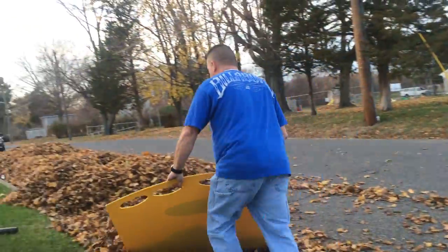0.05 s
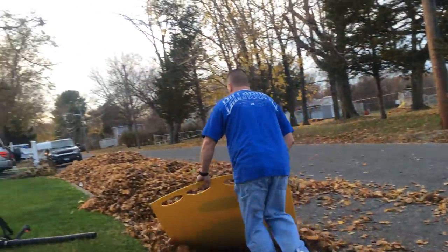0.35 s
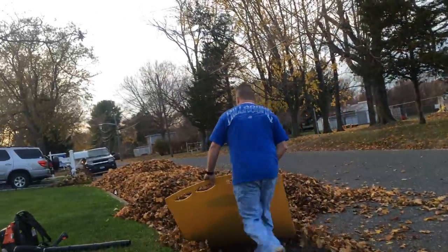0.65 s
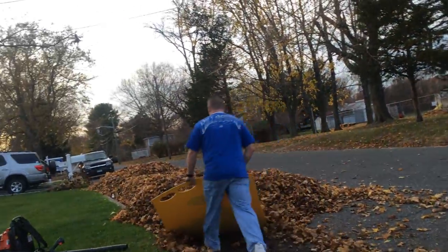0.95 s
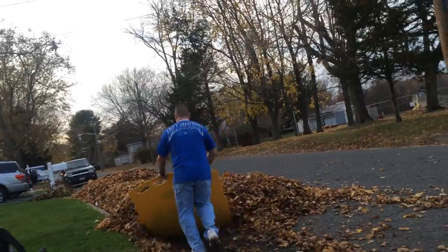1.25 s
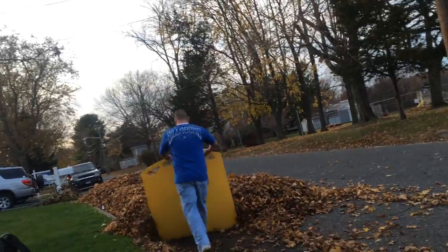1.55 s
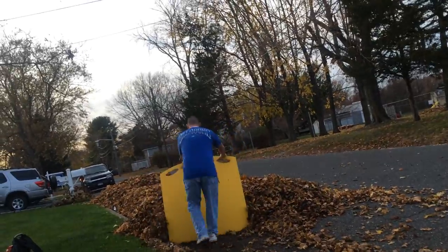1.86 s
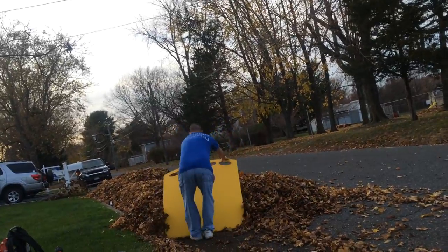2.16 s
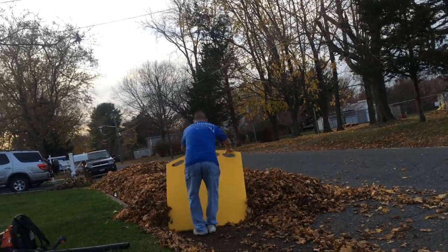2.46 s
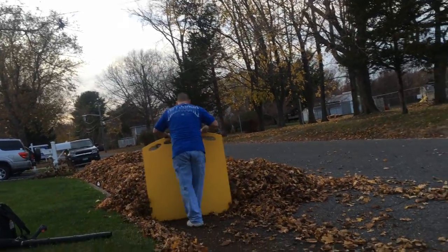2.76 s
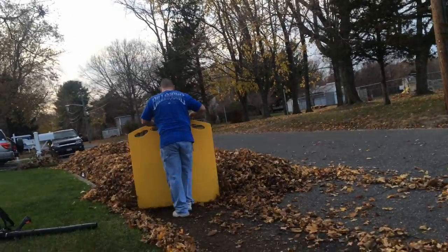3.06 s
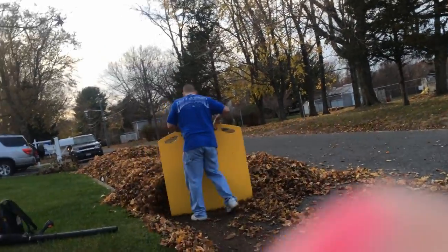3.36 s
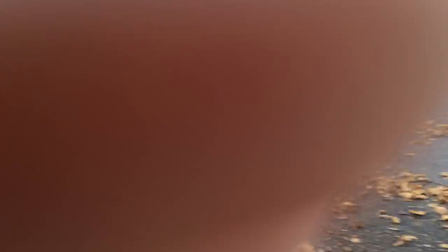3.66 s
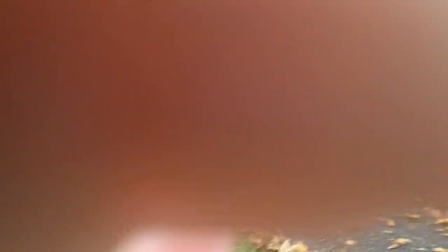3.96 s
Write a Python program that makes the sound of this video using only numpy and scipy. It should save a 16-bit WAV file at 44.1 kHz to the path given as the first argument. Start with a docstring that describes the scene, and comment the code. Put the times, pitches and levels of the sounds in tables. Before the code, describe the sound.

A large plastic blade scrapes across asphalt into dry leaves, crunching, drumming and groaning. It stops with a few scuffs and knocks, and the leaves settle. Faint traffic hums outdoors, and finally a hand bumps and rubs the microphone.

```python
"""An asphalt yard with distant traffic. A big plastic blade is shoved into a heap of dry leaves:
its edge chatters on the grit, leaves snap, and the plastic sheet drums and groans as it sticks and slips.
It stops and is tipped upright with short scuffs, taps and a few knocks, and the leaves settle.
Near the end a soft hiss swells and a hand bumps and rubs the microphone's case."""
import sys
import numpy as np
from scipy import signal
from scipy.fft import rfft, irfft
from scipy.io import wavfile
from scipy.ndimage import uniform_filter1d

SR = 44100
rng = np.random.default_rng(int(sys.argv[2]) if len(sys.argv) > 2 else 0)


def unload_audio(sound):
    """Save the sound as a 16-bit wav file, at the path given as the first command line argument."""
    columns = np.transpose(np.atleast_2d(sound))
    # keep every value between -1 and 1, then stretch to whole-number steps
    steps = np.round(np.clip(columns, -1, 1) * 32767)
    wavfile.write(sys.argv[1], SR, steps.astype(np.int16))


N = 176400
T = np.arange(N) / SR

# the shove (time [s], grit level [dB], drumming level [dB], rasp level [dB])
SHOVE = [(0,-23.5,-18,-37),(.07,-26.5,-25,-28),(.10,-30,-26,-34),(.21,-34.5,-20,-40.5),(.235,-32,-35,-35.5),(.27,-27,-20,-32.5),(.32,-29,-26,-29.5),(.345,-37.5,-33,-40.5),(.385,-30.5,-24.5,-31),(.45,-32.5,-27,-38),(.49,-31.5,-27.5,-33.5),(.58,-36.5,-29.5,-39.5),(.68,-28.5,-25.5,-37),(.76,-22,-22.5,-30.5),(.845,-24,-19.5,-34.5),(.876,-33.5,-25,-38.5),(1.0,-30.5,-26.5,-37),(1.07,-29.5,-21,-33.5),(1.18,-22.5,-21.5,-34),(1.245,-36,-24.5,-34.5),(1.282,-26,-23.5,-40.5),(1.328,-40.5,-27.5,-38),(1.35,-27.5,-26,-40),(1.37,-42,-38.5,-51),(1.422,-38.5,-37,-51),(1.52,-76,-88,-86)]
# modes of the plastic sheet (pitch [Hz], level [dB], t60 [s])
SHEET_MODES = [(142.6,-3,0.16),(189,1,0.047),(209,0.5,0.13),(230.6,-4.5,0.11),(261.5,-6.5,0.084),(330,-6.5,0.011),(394.3,-2.5,0.071),(440,-10,0.024),(536,-16.5,0.072),(677,-16.5,0.038),(792,-10.5,0.026),(963,-12.5,0.024)]
# midrange rasp of the dragged edge (frequency [Hz], level [dB])
RASP_EQ = [(150,-27.5),(600,8),(1000,6.5),(1350,1),(1800,-1),(2500,1),(3500,-1.5),(5000,-2),(9000,-17.5),(16000,-33)]
# dry tick of a hard contact (frequency [Hz], level [dB])
TICK_EQ = [(200,-21),(1000,2),(1700,0),(2600,1.5),(3700,-6.5),(5200,2.5),(8000,-1.5),(12000,-3.5),(15500,-15)]
KNOCK_RISE_S, MOTTLE_DB = 0.0017, 1.87


def amp(db):
    """Decibels to gain."""
    return 10 ** (np.asarray(db) / 20)


def unit(x):
    """Scales to rms 1."""
    return x / np.sqrt(np.mean(x ** 2) + 1e-20)


def curve(table, column=1):
    """One column of a table, joined by straight lines in time."""
    table = np.array(table)
    return np.interp(T, table[:, 0], table[:, column])


def add(mix, start, sound):
    """Mixes a sound in at a start time in seconds."""
    part = mix[max(round(start * SR), 0):][:len(sound)]
    part += sound[:len(part)]


def colour(x, eq, size=8192):
    """Minimum-phase EQ; white noise keeps its power."""
    hz, db = np.transpose(eq)
    log_bins = np.log(abs(np.fft.fftfreq(size, 1 / SR)) + 1)
    log_gain = np.interp(log_bins, np.log(hz), db) * np.log(10) / 20
    impulse = np.fft.ifft(np.exp(np.conj(signal.hilbert(log_gain)))).real[:size // 2]
    return signal.oaconvolve(x, impulse / np.linalg.norm(impulse))[:len(x)]


def resonate(x, hz, width_hz):
    """A resonance at a steady or gliding pitch; white noise keeps its power."""
    carrier = np.exp(2j * np.pi * np.cumsum(hz * np.ones(N)) / SR)
    pole = np.exp(-np.pi * width_hz / SR)
    gain = np.sqrt(2 * (1 - pole * pole))
    return (carrier * signal.lfilter([gain], [1, -pole], x * carrier.conj() + 1e-18)).real


def wander(hz):
    """Random modulation of rms 1, rolled off above the given rate."""
    lowpass = 1 / (1 + (np.fft.rfftfreq(N, 1 / SR) / hz) ** 4)
    return unit(irfft(rfft(rng.standard_normal(N)) * lowpass, N))


def clicks(per_s, spread_db):
    """Random clicks of uneven size, rms 1."""
    size = amp(spread_db * np.minimum(rng.exponential(1, N), 5))
    return unit(size * rng.choice([-1, 1], N) * (rng.random(N) < per_s / SR))


def mottle(x, depth_db, size=5):
    """Every crushed leaf and stone has its own colour: random patches of gain in time and pitch."""
    spectrum = signal.stft(x, nperseg=256)[2]
    patches = uniform_filter1d(rng.standard_normal(spectrum.shape), size, axis=0)
    patches = uniform_filter1d(patches, size, axis=1)
    return signal.istft(spectrum * amp(depth_db * unit(patches)))[1][:N]


def ring(modes):
    """One blow's ringing; each mode starts with a random sign, standing for the spot struck."""
    t = T[:SR // 2]
    return sum(amp(db - 60 * t / t60) * np.sin(2 * np.pi * hz * t) * rng.choice([-1, 1])
               for hz, db, t60 in modes)


def thud(hz, t60):
    """A damped blow: one tone that rises quickly and dies."""
    t = T[:SR // 2]
    attack = 1 - np.exp(-t / KNOCK_RISE_S)
    return 2 * np.sin(2 * np.pi * hz * t) * attack * amp(-60 * t / t60)


def yard(x):
    """Weak, short scatter from the ground, the heap and the trees."""
    t, t60 = T[:SR // 2], 0.11
    tail = rng.standard_normal(len(t)) * amp(-60 * t / t60) * (t > .003)
    return x + amp(-14.5) * signal.oaconvolve(x, tail / np.linalg.norm(tail))[:N]


def traffic():
    """A bed of far traffic with a low, uneven engine drone."""
    # road rumble (frequency [Hz], level [dB])
    rumble_eq = [(15, -77), (25, -23.5), (116, -5), (160, -12.5), (178, -10), (260, -17), (322, -19.5),
                 (410, -33.5), (1380, -29), (1850, -31), (2360, -33), (3440, -38), (3930, -55),
                 (15500, -100)]
    engine_hz = 108.6
    drone = unit(resonate(rng.standard_normal(N), engine_hz, width_hz=29))
    drone = unit(resonate(drone, engine_hz, width_hz=81))
    rumble = unit(colour(rng.standard_normal(N), rumble_eq))
    return amp(-44.5) * rumble + amp(-44) * drone


def settling_leaves():
    """Dry leaves crackle faintly as the heap settles."""
    # stirring of the heap (time [s], level [dB])
    settling = [(0,-72),(1.4,-58),(1.55,-55.5),(1.9,-50),(2.05,-57.5),(2.2,-53.5),(2.35,-61),(2.68,-65),(2.8,-57.5),(3.0,-62.5),(3.4,-53),(4,-66)]
    # crisp leaf tone (frequency [Hz], level [dB])
    leaf_eq = [(500,-34),(2000,-2),(4000,8.5),(7000,4.5),(10000,2),(15500,-3.5)]
    return colour(clicks(per_s=3500, spread_db=1) * amp(curve(settling)), leaf_eq)


def hiss():
    """A smooth hiss swells and brightens as the hand closes over the case."""
    # the swell (time [s], level [dB], tilt about 4 kHz [dB/octave])
    swell = [(0,-84.5,-17),(2.7,-65.5,-4.5),(3.0,-55.5,-4.5),(3.25,-54,-4),(3.4,-48.5,-2),(3.52,-46,-1.5),(3.68,-48,-0.5),(3.84,-41.5,-2),(3.95,-40.5,-1.5),(4,-42,-1)]
    # hiss tone before the tilt (frequency [Hz], level [dB])
    hiss_eq = [(100,4.5),(500,-0.5),(1500,-2),(4000,2),(8000,0),(12000,-6),(15500,-14)]
    hz, t, spectrum = signal.stft(colour(rng.standard_normal(N), hiss_eq), SR, nperseg=512)
    times, db, tilt = np.transpose(swell)
    octaves = np.log2(np.maximum(hz, 400) / 4000)[:, None]
    gain = amp(np.interp(t, times, db) + octaves * np.interp(t, times, tilt))
    return signal.istft(spectrum * gain, SR)[1][:N]


def hand_rubs():
    """Skin slides over the case with brief rustles and a faint hollow whisper."""
    # swishes (peak time [s], half-length [s], centre [Hz], bandwidth [Hz], level [dB])
    rubs = [(3.5,0.028,6950,2180,-44),(3.57,0.009,6450,2480,-47),(3.843,0.03,1520,260,-43.5),(3.865,0.042,740,400,-52)]
    return sum(amp(db) * np.exp(-((T - peak) / span) ** 2) * resonate(rng.standard_normal(N), hz, width)
               for peak, span, hz, width, db in rubs)


def hand_bump():
    """Skin scratches the case, the hand jolts it so that it rings, and fingers land with dull thuds."""
    # modes of the case (pitch [Hz], level [dB], t60 [s])
    case_modes = [(180,-24.5,0.26),(239,-29,0.099),(337,-19.5,0.079),(467,-28.5,0.12),(615,-20.5,0.12),(943,-29,0.053)]
    # fingers landing in turn (time [s], level [dB], pitch [Hz])
    fingers = [(3.468,-27.5,334),(3.477,-29,105),(3.487,-24,242),(3.521,-34,275),(3.551,-35.5,187)]
    # muffled thump of the hand (frequency [Hz], level [dB])
    thump_eq = [(30, -37), (80, 22), (250, 16.5), (600, -12), (900, -34), (1500, -43), (4000, -45),
                (15000, -65)]
    touch_s, jolt_s, ring_s = 3.4442, 3.4492, 3.4525
    jolt_hz, jolt_width_s, scratch_rise_s, thump_decay_s = 229, 0.0018, 0.0027, 0.022
    t = T - jolt_s
    blows = amp(-2.5) * np.sin(2 * np.pi * jolt_hz * t) * np.exp(-(t / jolt_width_s) ** 2)
    add(blows, ring_s, ring(case_modes) * amp(3 * wander(hz=150))[:SR // 2])  # the ring rattles
    for start, db, hz in fingers:
        add(blows, start, amp(db) * thud(hz, t60=0.064))
    thump_env = np.zeros(N)
    add(thump_env, ring_s, amp(-21.5) * np.exp(-T / thump_decay_s))
    thump = colour(thump_env * rng.standard_normal(N), thump_eq)
    age = np.maximum(T - touch_s, 0) / scratch_rise_s
    scratch_env = age * np.exp(1 - age) + amp(1) * (age > 0) * np.exp(-age / 5)
    scratch = colour(scratch_env * rng.standard_normal(N), TICK_EQ)
    return blows + thump + amp(-28) * scratch


def taps():
    """The edge is set down on the asphalt with dry clicks and brief rings."""
    # contacts (time [s], ring level [dB], pitch [Hz], click level [dB])
    contacts = [(1.682,-30,350,-55),(1.7835,-52,1500,-37),(1.7963,-35,1320,-40),(1.858,-36.5,790,-32.5)]
    rings, click_env = np.zeros(N), np.zeros(N)
    for start, db, hz, click_db in contacts:
        add(rings, start, amp(db) * thud(hz, t60=0.023))
        add(click_env, start, amp(click_db) * np.exp(-T / 0.0022))
    return rings + colour(click_env * rng.standard_normal(N), TICK_EQ)


def scuffs():
    """The edge drags briefly through leaves and grit as the blade is tipped up."""
    # drags (time [s], length [s], treble level [dB], rasp level [dB])
    drags = [(1.45,0.01,-39.5,-48),(1.639,0.0099,-44,-47),(1.658,0.019,-40.5,-62),(1.681,0.051,-44.5,-52),(1.712,0.043,-42,-54),(1.718,0.02,-43.5,-35.5),(1.781,0.011,-39,-51),(1.794,0.019,-45,-41),(1.86,0.012,-44,-39.5),(1.887,0.015,-40.5,-63),(2.119,0.075,-53,-47.5),(2.729,.01,-64,-47),(2.762,0.028,-57,-50.5)]
    # bright layer of a scuff (frequency [Hz], level [dB])
    scuff_eq = [(500,2),(2000,-7),(4000,-14.5),(6500,6),(9000,0.5),(12000,-3),(15500,-7)]
    treble_env, rasp_env = np.zeros(N), np.zeros(N)
    for start, length, treble_db, rasp_db in drags:
        shape = np.minimum(T / 0.0028, 1) * np.exp(-(T / length) ** 2)
        add(treble_env, start, amp(treble_db) * shape)
        add(rasp_env, start, amp(rasp_db) * shape)
    treble = colour(treble_env * clicks(per_s=3100, spread_db=-2), scuff_eq)
    rasp = colour(rasp_env * clicks(per_s=4600, spread_db=2), RASP_EQ)
    return mottle(treble + rasp, MOTTLE_DB)


def knocks():
    """The sheet buckles with short hollow thuds that wake its modes."""
    # buckles (time [s], level [dB], thud pitch [Hz])
    buckles = [(0.119,-17.5,205),(0.204,-22,242),(0.3944,-17.5,444),(0.501,-18.5,209),(0.658,-19,232),(1.346,-21,351),(1.733,-25,125),(1.763,-20,85),(1.797,-25,74),(1.854,-24,127),(1.859,-27.5,255),(1.901,-27,139),(2.1214,-17,278),(2.122,-20,116),(2.759,-40,513)]
    out = np.zeros(N)
    attack = 1 - np.exp(-T[:SR // 2] / KNOCK_RISE_S)
    for start, db, hz in buckles:
        ringing = attack * ring(SHEET_MODES) / np.sqrt(len(SHEET_MODES))
        add(out, start, amp(db) * (thud(hz, t60=0.067) + amp(-3) * ringing))
    return out


def judders():
    """Shoved or tipped, the sheet sticks and slips in short hollow bursts."""
    # bursts (peak time [s], half-length [s], level [dB], pitch [Hz], bandwidth [Hz])
    bursts = [(0.155,0.084,-26,164,80),(0.466,0.027,-24,433,90),(1.139,0.042,-29,530,120),(1.171,0.025,-23.5,375,126),(1.733,0.027,-32.5,288,134),(1.875,0.11,-44.5,212,117)]
    out = np.zeros(N)
    for peak, span, db, hz, width in bursts:
        envelope = amp(db) * np.exp(-((T - peak) / span) ** 2)
        out += envelope * resonate(clicks(per_s=600, spread_db=2), hz, width)
    return out


def groan():
    """Against the heap the slips lock to the sheet and it holds a rough, hollow note."""
    # near-regular stick-slip under full load (time [s], level [dB], slip rate [Hz])
    note = [(.74,-52,340),(.785,-27.5,237),(.85,-27,235),(.885,-32,210),(.915,-19,210),(.955,-29,265),(1.02,-23,270),(1.08,-20.5,277),(1.17,-22.5,305),(1.21,-26,270),(1.24,-17,242),(1.30,-25.5,240),(1.41,-36.5,266),(1.47,-79,300)]
    jitter, flutter_db, octave_db = 0.1405, 3.5, -15.5
    hz = curve(note, column=2) * (1 + jitter * wander(hz=72))
    phase = 2 * np.pi * np.cumsum(hz) / SR
    level_db = curve(note) + flutter_db * wander(hz=62.3)
    return amp(level_db) * (np.sin(phase) + amp(octave_db) * np.sin(2 * phase))


def leaf_crunch():
    """Brittle leaves snap in small clusters under the moving edge, each size at its own pitch."""
    # leaf sizes (pitch [Hz], level [dB])
    sizes = [(1900,-13.5),(3800,-11.5),(6600,-3),(8300,-5)]
    clusters = unit(amp(5 * wander(hz=44)))
    load = amp(curve(SHOVE) - 6.5) * clusters
    return sum(amp(db) * resonate(load * clicks(per_s=130, spread_db=1.5), hz, width_hz=1200)
               for hz, db in sizes)


def sheet(force):
    """The driven sheet rings, its modes gliding up as leaves pile before it and tighten it."""
    # flexing (time [s], pitch factor [ratio])
    flexing = [(0,1.01),(.42,0.97),(.68,0.99),(.8,1.15),(.95,1.42),(1.12,1.378),(1.25,1.21),(1.38,1.36)]
    bend = curve(flexing)
    rings = sum((-1) ** k * amp(db) * resonate(force, hz * bend, width_hz=2.2 / t60)
                for k, (hz, db, t60) in enumerate(SHEET_MODES))
    return rings / np.linalg.norm([amp(db) for hz, db, t60 in SHEET_MODES])


def snags():
    """The edge catches on stones and snaps free: a falling crack, a spray of grit, a thump of the sheet."""
    # catches (time [s], crack level [dB], thump level [dB])
    catches = [(0.0432,-10,-6),(0.0599,-6,-9.5),(0.1407,-6.5,-13),(0.164,-4.5,-29),(0.2073,-5.5,-12),(0.2434,-10,-37),(0.3105,-9,-7.5),(0.3193,-5,-17),(0.3626,-15,-13),(0.3948,-5,-12),(0.417,-8.5,-16),(0.4323,0,-32),(0.4507,-9,-15),(0.469,-15,-34),(0.4991,-10,-13),(0.5304,-8,-17),(0.598,-9,-32),(0.6107,-17,-17),(0.664,-8,-6.5),(0.669,-8,-38),(0.8,-19,-6),(0.839,-1,-21),(0.9813,-20,-31),(1.058,-5,-22),(1.1464,-12,-33),(1.1952,-14,-26),(1.3405,-15,-31),(1.4131,-19.5,-27)]
    # tone of the crack (frequency [Hz], level [dB])
    crack_eq = [(200,-11),(1000,0),(2000,-12.5),(3200,-8),(5000,-3.5),(6700,5),(9000,-1.5),(12000,-10),(15500,-14)]
    cracks, blows, t = np.zeros(N), np.zeros(N), T[:SR // 10]
    spike = np.exp(-((t - 0.0015) / 0.0005) ** 2)
    spray = amp(-8.5) * np.exp(-t / 0.0088)
    for start, crack_db, thump_db in catches:
        add(cracks, start, amp(crack_db - 11.5) * (spike + spray) * rng.choice([-1, 1], len(t)))
        add(blows, start, amp([thump_db + 16]))
    delay_s = 0.001597 * np.exp(-np.fft.rfftfreq(N, 1 / SR) / 6000)  # lows trail the highs
    cracks = irfft(rfft(cracks) * np.exp(-2j * np.pi * np.cumsum(delay_s) * SR / N), N)
    return mottle(colour(cracks, crack_eq), depth_db=2, size=9) + sheet(blows)


def scrape():
    """The edge grinds over grit in clumps, and its slips drum the sheet."""
    # sizzle of the grit (frequency [Hz], level [dB])
    grit_eq = [(300,-59),(2500,-42),(4000,-15),(5200,-7),(6300,0.5),(7400,1.5),(9000,-3),(11000,-5),(13000,-11.5),(15500,-18)]
    # hollow body of the blade (frequency [Hz], level [dB])
    body_eq = [(25,-76),(70,-2),(130,-15.5),(200,4.5),(350,-3),(550,-6),(800,-16.5),(1300,-36.5),(3000,-29),(16000,-39)]
    clumps_db = 3 * wander(hz=80)
    grit = clicks(per_s=9000, spread_db=2.5) * amp(curve(SHOVE, column=1) - 5 + clumps_db)
    rasp = clicks(per_s=9000, spread_db=2) * amp(curve(SHOVE, column=3) - 1 + 0.31 * clumps_db)
    slips = clicks(per_s=700, spread_db=2) * amp(curve(SHOVE, column=2) + 0.28 * clumps_db)
    grind = mottle(colour(grit, grit_eq) + colour(rasp, RASP_EQ), MOTTLE_DB)
    return grind + amp(-1.5) * colour(slips, body_eq) + amp(-1) * sheet(slips)


def scene():
    """Mono mix: the blade with the yard's scatter, everything else dry."""
    blade = scrape() + leaf_crunch() + snags() + judders() + groan() + scuffs() + knocks() + taps()
    return (yard(blade) + settling_leaves() + traffic() + hiss() + hand_bump() + hand_rubs())[None]


def record(dry):
    """A low cut and a steep band limit on the mix."""
    low_cut_hz, high_cut_hz = 32.6, 15500
    cut = signal.lfilter(*signal.butter(2, low_cut_hz, "high", fs=SR), dry)
    lowpass = signal.firwin(401, high_cut_hz, window=("kaiser", 9), fs=SR)
    return signal.oaconvolve(cut, lowpass[None], "same")


dry = scene()
out = record(dry)
unload_audio(out)
```